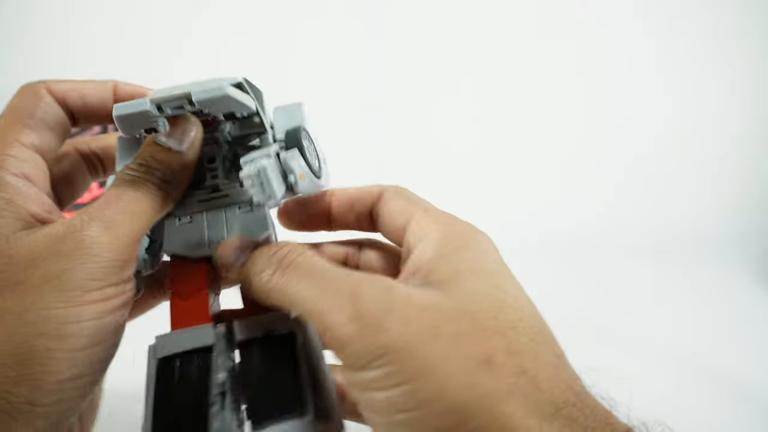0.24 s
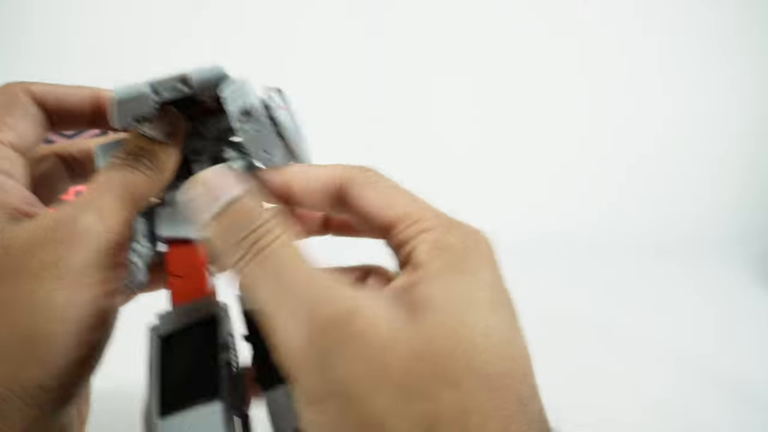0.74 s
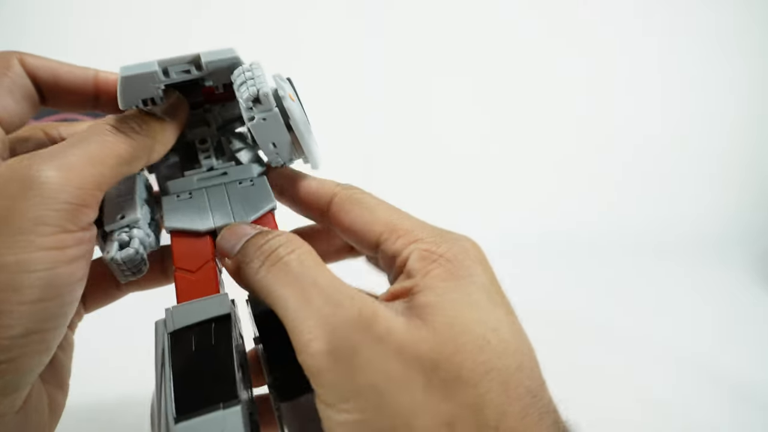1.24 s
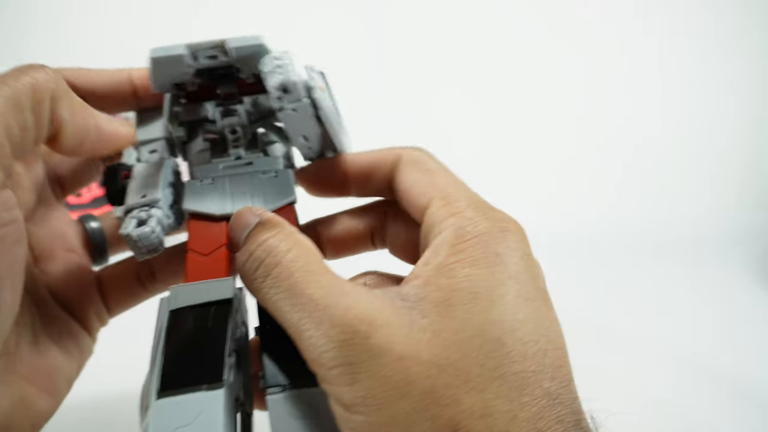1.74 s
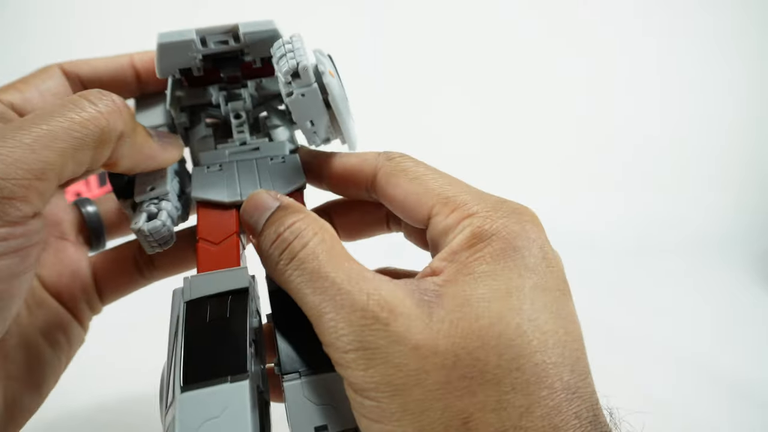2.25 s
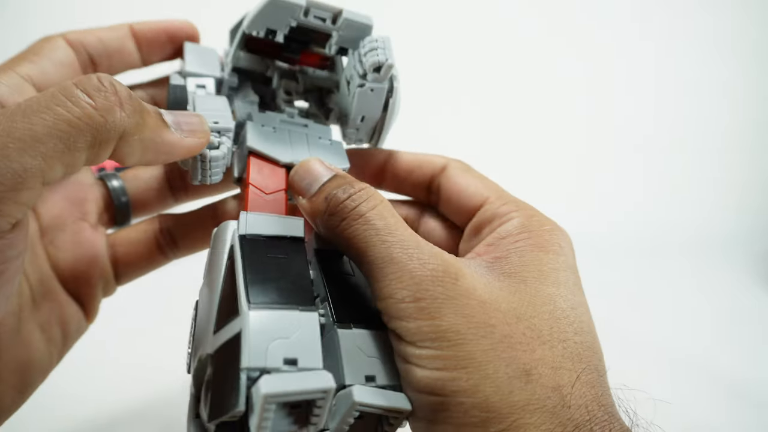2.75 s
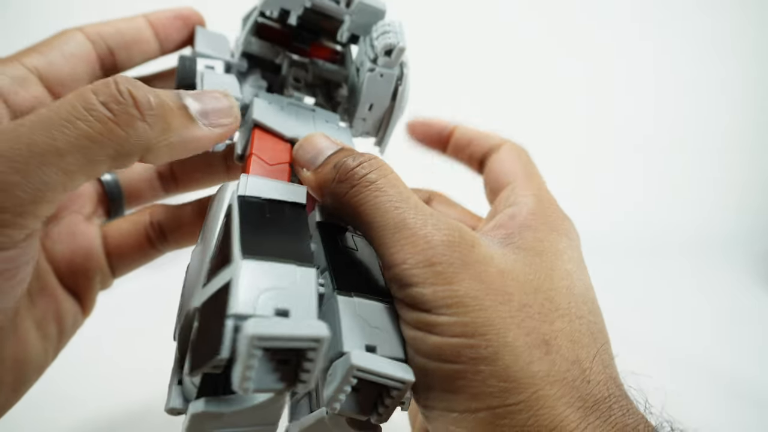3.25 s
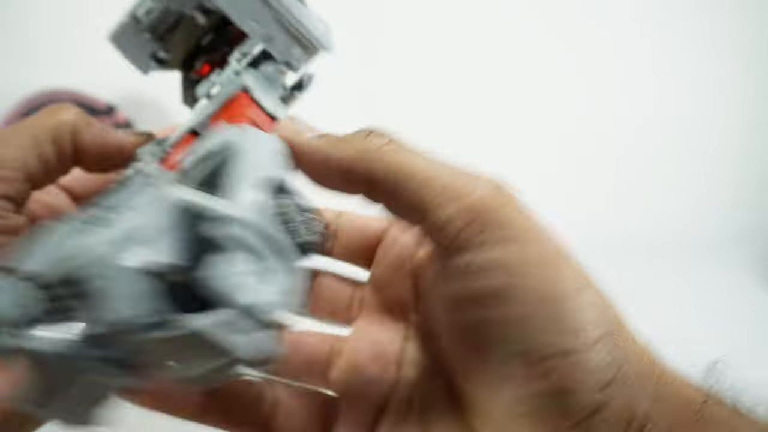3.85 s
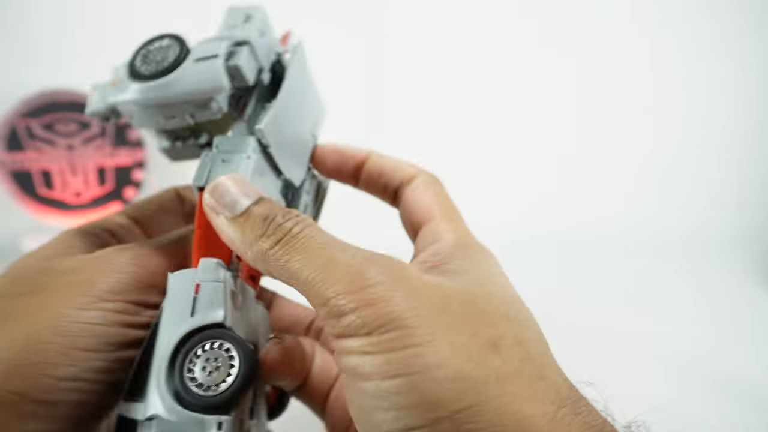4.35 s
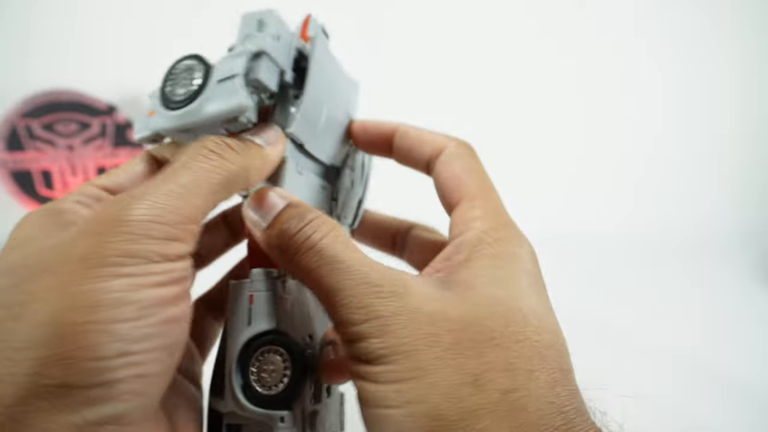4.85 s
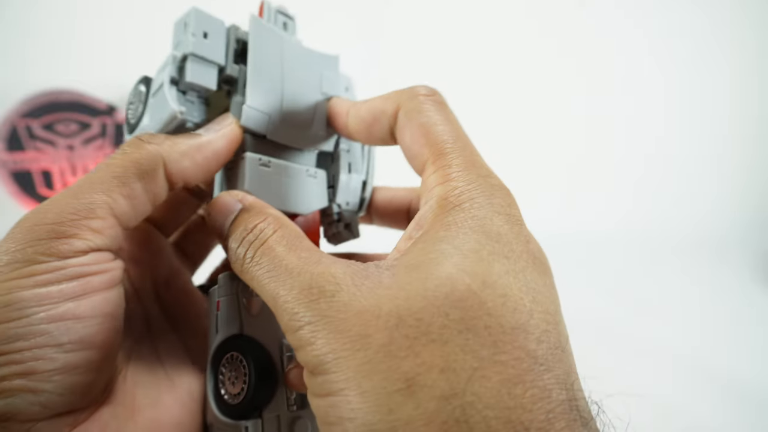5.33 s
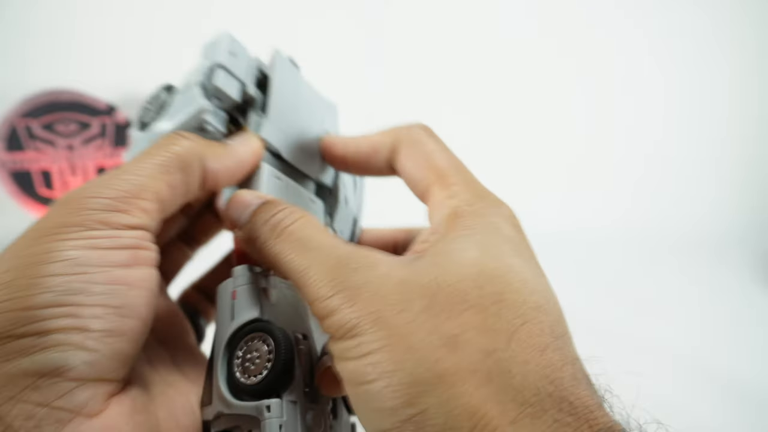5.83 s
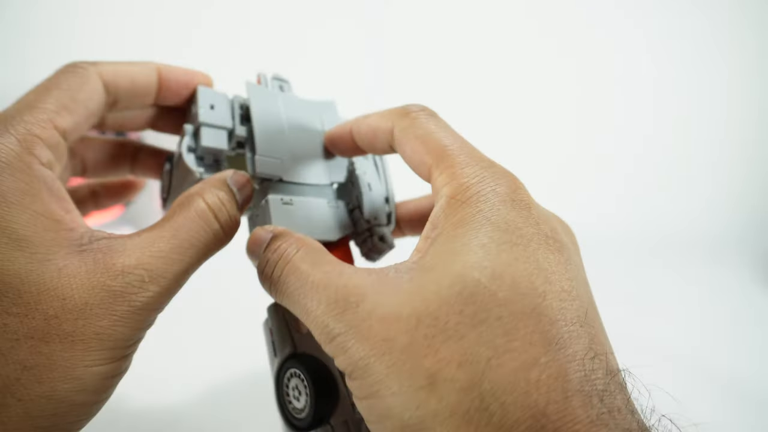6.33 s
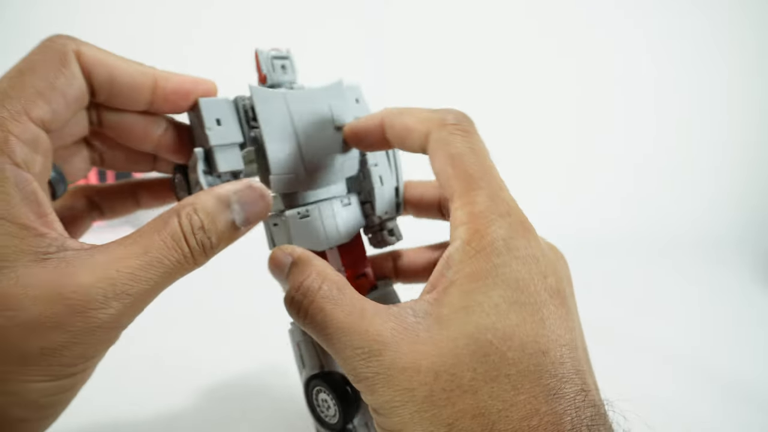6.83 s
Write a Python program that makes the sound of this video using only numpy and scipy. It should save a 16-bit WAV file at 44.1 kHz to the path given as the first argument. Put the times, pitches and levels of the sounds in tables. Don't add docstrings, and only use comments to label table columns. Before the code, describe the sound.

Hard plastic shells and joints click, pop and grind as fingers turn and press them, very close and dry. An early cluster of bright snaps thins to quiet pops, then a busier, much louder flurry comes past the halfway point. Afterwards only small separate clicks remain over soft rubbing and faint room hush, closing with a dull thump on the table.

```python
import sys
import numpy as np
from scipy import signal
from scipy.io import wavfile
from scipy.ndimage import uniform_filter1d

SR = 44100
rng = np.random.default_rng(int(sys.argv[2]) if len(sys.argv) > 2 else 0)


def wav_record(signal):
    frames = np.transpose(np.atleast_2d(signal))
    bounded = np.clip(frames, -1, 1)
    quanta = np.round(bounded * 32767).astype(np.int16)
    wavfile.write(sys.argv[1], SR, quanta)


def to_linear_factor(level_db):
    exponent = np.asarray(level_db, float) / 20
    return 10 ** exponent


N = 312436


def evened(x):
    return x / np.sqrt(np.mean(x ** 2) + 1e-20)


def read(points, hz):
    f, value = np.transpose(points)
    return np.interp(np.log(hz + 1), np.log(f + 1), value)


def add(mix, s, sound):
    part = mix[..., round(s * SR):][..., :sound.shape[-1]]
    part += sound[..., :part.shape[-1]]


def band(x, lo_hz, hi_hz):
    sos = signal.butter(2, [lo_hz, min(hi_hz, SR / 2.2)], "bandpass", fs=SR, output="sos")
    return signal.sosfilt(sos, x)


def ring(hz, db, t60, phase, t, rise=0.00048):
    decay = to_linear_factor(db - 60 * t[:, None] / t60)
    modes = decay * np.sin(2 * np.pi * hz * t[:, None] + phase)
    return modes.sum(1) * (1 - np.exp(-t / rise))


# f/Hz, level/dB
RADIATION = [(900, -8), (1500, -19), (2200, -10.5), (3200, -1), (5000, -0.5), (8000, -1), (10000, -9),
             (16000, -14.5)]


def colour(hz, hollow_db, bright_db):
    tilt = [(2200, hollow_db + 11.5), (2800, 0), (5200, 0.0096), (6500, bright_db + 9.5)]
    return read(RADIATION, hz) + read(tilt, hz)


# f/Hz, bandwidth/Hz, level/dB
SHELL = [(1871, 44.3, 1.5), (2250, 260, 1), (2730, 230, -13.5), (3130, 220, 3), (3932, 120, -1.5),
         (4430, 110, 0), (5540, 58, -27.5)]


def tick(own_hz, hollow_db, bright_db, draw, t60, own_db):
    shell_hz = np.array(SHELL)[:, 0]
    panels_hz = np.geomspace(1000, 15500, 60) * (1 + 0.073 * (draw[:60] - .5))
    hz = np.r_[shell_hz, panels_hz, own_hz]
    uneven_db = 12 * (draw[60:60 + len(hz)] - .5)
    db = colour(hz, hollow_db, bright_db) + uneven_db
    db[-1] = colour(own_hz, hollow_db, bright_db) + own_db
    dies = t60 * (3000 / hz) ** .9 * (.4 + draw[130:130 + len(hz)])
    dies[-1] = 1.46 * t60 * (3000 / own_hz) ** 0.67
    phase = 2.49 * draw[200:200 + len(hz)]
    return ring(hz, db, dies, phase, np.arange(1200) / SR, rise=0.00039)


def click(row, draw):
    s, peak_db, own_hz, hollow_db, bright_db, own_db, loose = row
    lead, span = 60, 600
    rebound_share, rebound_s = 0.43, 0.0075
    seat = 0.24
    at = (draw[270:280] ** 1.5 * span).astype(int)
    sign = np.sign(draw[280:290] - .5)
    fade = np.exp(-abs(at - lead) / SR / rebound_s)
    contact = np.zeros(span)
    contact[at] = loose * rebound_share * to_linear_factor(-seat * (peak_db + 40.5)) * sign * fade
    contact[lead] = 1
    snap = tick(own_hz, hollow_db, bright_db, draw, .016, own_db)
    sound = np.convolve(snap, contact)
    return s - lead / SR, to_linear_factor(peak_db + 2.5) * sound / abs(sound).max()


def crunch(row, draws):
    start, end, start_db, end_db, own_hz, bright_db = row
    size = int(np.clip((end - start) * SR, 50, SR // 8))
    push = to_linear_factor(np.linspace(start_db, end_db, size)) * signal.windows.tukey(size, .4)
    chance, side, force = np.moveaxis(rng.random((len(draws), 3, SR // 8))[..., :size], 1, 0)
    contacts = (chance < 700 / SR) * np.sign(side - .5)
    contacts = contacts * to_linear_factor(-2.2 * np.log(force + .004))
    contacts /= np.sqrt((contacts ** 2).sum(0).mean() + 1e-12)
    gentle = np.clip((-41.5 - max(start_db, end_db)) / 14, 0, 1) * (own_hz < 5000)
    sound = 0
    for contact, draw in zip(contacts, draws):
        spot = tick(own_hz, -5.0, bright_db, draw, 0.022, 8 + 6 * gentle)
        sound = sound + signal.fftconvolve(contact * push, spot / np.linalg.norm(spot))
    return start, sound


# t/s, peak level/dB, f/Hz
DULL = [(0.5908, -24, 2670), (0.6135, -20.5, 3130), (0.7057, -18, 3130), (0.7165, -30.5, 3050),
        (1.134, -43, 1610), (1.4468, -31.5, 2390), (1.4535, -36, 3290), (1.656, -47, 3270),
        (2.055, -48, 3880), (2.0666, -46, 1860), (2.076, -41, 1830), (2.123, -48, 1900), (2.526, -51, 1970),
        (2.549, -48, 1970), (2.631, -46, 2830), (2.6586, -44, 2880), (3.2113, -43, 2340),
        (3.3204, -48, 3100), (3.4152, -46, 2940), (3.4654, -46, 2400), (3.4713, -46, 2240),
        (3.4785, -45, 2820), (3.5113, -25, 3050), (3.571, -42, 2450), (3.625, -49, 4900),
        (3.7705, -39, 1800), (3.892, -41, 2020), (3.906, -22, 2260), (3.924, -21, 2300),
        (3.9387, -23, 3230), (4.0311, -44, 2140), (4.073, -39, 3440), (4.1125, -15.5, 2740),
        (4.2625, -14, 2280), (4.352, -43, 3130), (4.59, -41, 2370), (4.769, -45, 4520), (4.8335, -38, 2280),
        (5.6274, -44, 3000), (5.8565, -45, 2620), (5.926, -40, 2430), (6.187, -38.5, 3160),
        (6.378, -44, 4900), (6.597, -40.5, 1920), (6.6614, -43, 4300), (6.9167, -43, 4150),
        (4.8276, -20, 6270), (2.1395, -53, 3470), (2.2957, -52, 3400), (3.442, -43, 2320),
        (0.744, -42, 2200), (0.776, -46, 2150), (6.7138, -40.5, 2040)]
# t/s, peak level/dB, f/Hz
SHARP = [(.5835, -28, 8600), (0.606, -26, 8500), (0.674, -22, 5800), (.8628, -34.5, 7860),
         (1.3613, -41, 4370), (1.4433, -35, 6540), (2.16, -56, 6000), (2.6211, -53, 5240),
         (3.2307, -41, 5700), (3.4535, -46, 4600), (3.9446, -23, 7540), (3.9479, -15.5, 4560),
         (4.144, -19, 7600), (4.1485, -14, 7900), (4.315, -26, 7750), (5.9355, -41, 4340),
         (5.9767, -31, 12400)]


def rebounds(draws):
    out = np.zeros((2, N))
    rows = [(*row, -6, -16, .018, 13) for row in DULL]
    rows += [(*row, -14, 2, .011, 7) for row in SHARP]
    for (s, peak_db, own_hz, hollow_db, bright_db, t60, own_db), draw in zip(rows, draws[::-1]):
        snap = tick(own_hz, hollow_db, bright_db, draw, t60, own_db)
        snap /= abs(snap).max()
        lag_s = (own_hz > 4000) * np.sign(draw[-1] - .5) / SR
        add(out[0], s, to_linear_factor(peak_db + 1.0) * snap)
        add(out[1], s + lag_s, to_linear_factor(peak_db + 1.5) * snap)
    return out


# t/s, peak level/dB, loudest mode f/Hz
BOX = [
    (.262, -38, 2120),
    (1.291, -42, 2230),
    (3.5068, -26, 2300),
    (3.5111, -22, 2440),
    (3.5618, -34, 1380),
    (3.9935, -41.5, 2420),
    (4.092, -35, 1820),
    (4.1883, -30.5, 1960),
    (4.8642, -48, 2250),
    (5.632, -42.5, 3200),
]
SOCKET = [
    (1.5838, -45.5, 3530),
    (2.1387, -43, 1910),
    (2.1898, -43, 1870),
    (2.2951, -41, 1910),
    (2.361, -45.5, 1890),
    (4.0616, -42.5, 2270),
    (6.5818, -49, 3120),
    (6.7116, -39.5, 4270),
]
LATCH = [(.577, -17.5, 7240), (.7047, -18.5, 3130), (.9561, -29, 4650), (.958, -30, 4500),
         (1.44, -26, 3860), (1.7992, -37.5, 3300), (1.817, -30.5, 2950), (3.3507, -41, 3330),
         (3.3545, -31.5, 2970), (3.415, -41, 4760), (3.9013, -16.5, 3100), (3.9615, -13, 4660),
         (4.0247, -50, 3290), (4.1281, -14.5, 2790), (4.1335, -6, 2530), (4.1409, -7, 2850),
         (4.2176, -28.5, 3220), (4.3236, -15.5, 5470), (4.738, -33, 4490), (4.7789, -34.5, 4950),
         (6.2127, -38, 3360), (6.3834, -37, 4570)]
GRIPPED = [(.1157, -28, 3134), (.7537, -26.5, 3000), (.8343, -30.5, 3030), (2.5984, -40, 3130),
           (2.6516, -35, 3130), (3.5228, -23, 2480), (3.7887, -26.5, 2265), (3.8354, -45, 3160),
           (3.9189, -18, 3200), (4.1556, -21, 2710), (4.2995, -19.5, 3370), (4.4221, -32.5, 2660),
           (4.9875, -41, 3090), (5.5593, -38.5, 2100), (5.7737, -46, 3050), (5.9233, -44, 4170),
           (6.316, -41.5, 3530), (6.6876, -36, 4180), (6.7079, -38, 3250), (6.942, -42, 3900),
           (6.951, -32, 4110)]
PIN = [(.1773, -41, 3950), (.5718, -28, 3000), (.587, -18, 2740), (.6003, -26, 6900), (.6763, -21.5, 7000),
       (.726, -18, 7370), (.8621, -34, 2820), (.9807, -27.5, 3250), (1.8355, -42.5, 3130),
       (2.074, -42, 2750), (3.5329, -19, 3110), (4.0863, -37, 2250), (4.108, -17.5, 3240),
       (4.5754, -30.5, 3350), (4.8794, -36.5, 3180), (5.9433, -37, 4400), (6.1763, -25, 3730)]
STUD = [
    (.3794, -40, 3400),
    (.7088, -18, 3250),
    (.9689, -24, 3250),
    (3.433, -38, 4340),
    (4.147, -16, 2260),
    (5.9735, -24, 3270),
    (6.1643, -27, 3250),
]
PANEL = [(.6937, -30, 2850), (1.4759, -40, 3230), (1.7882, -39.5, 3330), (3.6946, -34, 4660),
         (3.7263, -43, 2100), (3.757, -30, 5270), (3.787, -28.5, 2310), (3.9335, -24.5, 3120),
         (3.944, -23.5, 4540), (3.978, -34.5, 4530), (4.259, -11.5, 3020), (4.3065, -22.5, 3540),
         (4.5674, -42, 3290), (4.9032, -44, 2170), (4.9171, -43, 3130), (5.4406, -36.5, 3040),
         (5.8613, -43, 2490)]
FLAP = [(.0861, -34.5, 4600), (.2318, -44, 4280), (.3939, -31.5, 2170), (.6108, -17, 3040),
        (.6702, -27, 7600), (1.4982, -34.5, 4380), (3.7403, -40, 3030), (3.958, -18, 4600),
        (4.0991, -25, 2180), (4.3125, -28, 3630), (4.3584, -36, 2630), (4.7293, -40.5, 3100),
        (4.7475, -31, 5700), (4.8295, -21, 6000), (5.5074, -43, 2280), (5.6036, -33, 2030),
        (6.1779, -28, 3180), (6.2299, -38, 1960)]
# t/s, peak level/dB, f/Hz
FAINT = [
    (2.58, -53, 2470),
    (2.7457, -48, 3220),
    (3.228, -43, 2750),
    (5.8274, -49, 3220),
    (6.083, -41, 4800),
    (6.295, -52, 3480),
    (6.6577, -49, 4100),
]
# t/s, peak level/dB, f/Hz
SPECK = [
    (2.453, -63, 9600),
    (2.58, -48, 8500),
    (2.684, -50, 8200),
    (6.35, -52, 9500),
]
# start t/s, end t/s, top level/dB, loudest mode f/Hz, bright part level/dB
SETTLING = [(0.0, 0.075, -50.5, 2230, -1), (0.372, 0.415, -45, 1910, -5), (0.867, 0.876, -33.5, 2500, -33),
            (0.955, 1.003, -29.5, 3294, -4), (1.117, 1.243, -52.5, 4650, -6),
            (1.44, 1.456, -30.5, 1930, -4), (3.033, 3.093, -55, 4660, -27), (3.29, 3.38, -47, 1920, -6.5),
            (3.497, 3.559, -29, 2370, -18), (3.542, 3.555, -35, 1480, -9), (3.781, 3.806, -32.5, 2200, -9),
            (3.975, 3.97, -43, 4650, -11), (4.017, 4.06, -42, 2140, -13), (4.163, 4.215, -34.5, 2410, -18),
            (4.262, 4.278, -22.5, 2390, -11), (4.335, 4.378, -36, 2590, -7), (4.734, 4.786, -45, 3130, -13),
            (4.766, 4.826, -42, 4850, -9), (6.167, 6.208, -35, 3350, -9), (6.361, 6.47, -52.5, 4840, -5),
            (6.584, 6.673, -54, 4120, -15)]
STRAINING = [(1.602, 1.663, -45, 3380, 2.5), (1.844, 1.932, -57.5, 3040, -7),
             (3.401, 3.467, -45.5, 2380, -9), (3.721, 3.775, -37.5, 3070, -5),
             (4.074, 4.108, -30, 3120, -18), (4.456, 4.498, -43, 2350, -17), (4.867, 4.928, -48, 3130, -15),
             (5.488, 5.518, -44, 2450, -20), (6.134, 6.163, -46, 2230, -7), (6.925, 6.967, -39, 4200, -28)]
SLIDING = [(0.268, 0.328, -50.5, 6060, -8.5), (0.517, 0.582, -51.5, 2970, -10),
           (0.563, 0.64, -34.5, 3010, -0.5), (0.669, 0.738, -38, 3130, -8), (0.748, 0.81, -50, 2160, -30),
           (1.228, 1.36, -58.5, 2260, -11), (1.302, 1.391, -54, 5620, -2.5),
           (1.769, 1.836, -57.5, 3050, -4), (2.53, 2.654, -66, 2600, -12), (3.195, 3.284, -59, 2860, -23),
           (3.347, 3.4, -50.5, 2990, -4.5), (3.46, 3.53, -42.5, 3380, -7.5), (3.9, 3.973, -34, 3200, -14),
           (4.129, 4.16, -22, 2240, -27), (4.205, 4.256, -37, 3260, -4), (4.301, 4.329, -30, 3510, -19),
           (5.912, 5.971, -51.5, 4250, -7), (5.972, 6.013, -49.5, 2406, -2), (6.669, 6.73, -58, 4200, -29)]


def clicks():
    parts = [(BOX, 7.8, -7, 9.6, 1), (SOCKET, 0.3, -23, 18.4, 0.21), (LATCH, -17.5, -7.5, 10.3, 0.9),
             (GRIPPED, -5, -17, 13.6, 1), (PIN, -3.7, -1.2, 8.9, .9), (STUD, -6, 5.2, 9, 0.96),
             (PANEL, -1.5, -5, 11.4, 1), (FLAP, -11.5, -9.5, 11.2, 1)]
    taps = sorted((*row, *part) for rows, *part in parts for row in rows)
    rattles = [(a, b, db, db - 19, *c) for a, b, db, *c in SETTLING]
    rattles += [(a, b, -60, db, *c) for a, b, db, *c in STRAINING]
    rattles += [(a, b, db, db, *c) for a, b, db, *c in SLIDING]
    rattles.sort()
    draws = rng.random((len(taps), 290))
    sounds = [click(row, draw) for row, draw in zip(taps, draws)]
    faint_draws = rng.random((len(FAINT), 290))
    sounds += [click((*row, -8, -6, 13, .9), draw) for row, draw in zip(FAINT, faint_draws)]
    spots = rng.random((len(rattles), 6, 290))
    sounds += [crunch(row, draw) for row, draw in zip(rattles, spots)]
    out = np.zeros((2, N))
    sides_db = 0.42 * rng.uniform(-2.2, 1, len(sounds))
    for (s, sound), side_db in zip(sounds, sides_db):
        add(out, s, sound * to_linear_factor([[side_db], [-side_db]]))
    for row, draw in zip(SPECK, rng.random((len(SPECK), 290))):
        add(out, *click((*row, -20, 14, 1.5, .2), draw))
    return out + rebounds(draws)


# t/s, rubbing level/dB
EFFORT = [(0.0, -46.5), (.33, -52), (.59, -60), (.71, -42), (.82, -45.5), (1.22, -61), (1.44, -50),
          (2.31, -64.5), (2.62, -51), (2.85, -64), (3.37, -49.5), (4.04, -48), (4.24, -36.5), (4.51, -50),
          (4.81, -51), (5.3, -64), (6.1, -54), (7.08, -57)]


def rubbing():
    s, rub_db = np.transpose(EFFORT)
    t = np.arange(N) / SR
    out = np.zeros(N)
    for hz, width, db in SHELL:
        slips = to_linear_factor(2.3 * np.minimum(rng.exponential(1, N), 5))
        slips *= (rng.random(N) < 450 / SR) * rng.choice([-1, 1], N)
        grip = uniform_filter1d(rng.standard_normal(150), 2)
        grip_db = 2.4 * evened(np.interp(t, np.arange(150) / 20, grip))
        tap = ring(np.array([hz]), 0, 1.9 / (width + 100), 0, t[:1500])
        out += to_linear_factor(0.63 * db + grip_db) * signal.oaconvolve(slips, evened(tap))[:N]
    fizz = to_linear_factor(2.0 * rng.exponential(1, N)) * (rng.random(N) < 4000 / SR) * rng.standard_normal(N)
    body = evened(out) + 1.2 * evened(band(fizz, 1600, 6240))
    bright = to_linear_factor(-12.5) * evened(band(fizz, 3900, 13400))
    return to_linear_factor(np.interp(t, s, rub_db) - 8) * (evened(body) + bright)


# t/s, level/dB, f/Hz
KNOCKS = [
    (.612, -45, 1150),
    (.706, -45, 1210),
    (0.863, -48, 260),
    (3.509, -44, 640),
    (3.5105, -36, 1270),
    (4.132, -38, 480),
    (4.1333, -47, 206),
    (4.133, -34, 950),
    (6.177, -45.5, 306),
    (6.35, -48, 413),
]


def knocks():
    out = np.zeros(N)
    t = np.arange(3000) / SR
    for s, db, hz in KNOCKS:
        add(out, s, ring(hz * np.array([.6, 1, 1.5]), db, 9 / hz + 0.0093, 0, t, rise=0.0016))
    return out


# middle t/s, length t/s, rumble level/dB
LEANS = [
    (0.14, .2, -58.5),
    (0.705, .5, -70),
    (2.552, 0.37, -72),
    (3.558, 0.16, -55),
    (4.1, 1.6, -67),
    (4.862, 0.86, -71),
    (5.684, 0.18, -74),
    (6.193, 0.74, -68),
]
# f/Hz, level/dB, t60/s
BUMP = [(50, -45, 0.3), (86, -24, 0.15), (146.6, -29, 0.096), (163, -34, 0.19)]


def table():
    t = np.arange(N) / SR
    weight = to_linear_factor(-79.5)
    for s, length, db in LEANS:
        weight = weight + to_linear_factor(db) * np.cos(np.pi * np.clip((t - s) / length, -.5, .5)) ** 2
    out = weight * evened(band(band(rng.standard_normal(N), 27, 84), 33.4, 190))
    hz, db, t60 = np.transpose(BUMP)
    phase = np.array([-2.5, 5.0, 7.5, 1.5])
    add(out, 6.998, ring(hz, db - 3, t60, phase, np.arange(5000) / SR, rise=0.0053))
    return out


def sleeves():
    drift = np.interp(np.arange(N) / SR, np.arange(100) / 12, rng.standard_normal(100))
    noise = band(band(rng.standard_normal(N), 420, 650), 420, 650)
    return to_linear_factor(-78.5 + 5 * evened(drift)) * evened(noise)


# f/Hz, level/dB per Hz
AIR = [(18, -27), (30, -19), (106, -5.5), (189, -2.5), (400, -7.5), (1860, -13), (6550, -21), (16000, -31)]
# f/Hz, likeness/1
SAME = [(60, 0.91), (380, 0.67), (2380, 0.32), (15000, 0.071)]


def hush():
    frames, hz = N // 256 + 5, np.fft.rfftfreq(1024, 1 / SR)
    a, b, c, d, patches = rng.standard_normal((frames, 513, 5)).T
    patches = evened(uniform_filter1d(uniform_filter1d(patches, 4, 0), 14, 1))
    same = np.clip(read(SAME, hz), -1, 1)[:, None]
    left, other = a + 1j * b, c + 1j * d
    z = np.array([left, same * left + np.sqrt(1 - same ** 2) * other])
    z *= to_linear_factor(read(AIR, hz)[:, None] + 2.8 * patches)
    return to_linear_factor(-60.5) * evened(signal.istft(z, nperseg=1024, noverlap=768)[1][:, :N])


def room(x, t60, gap_s):
    taps = np.zeros((2, SR // 2))
    at = np.arange(0, SR // 2 - 20, 20) + rng.integers(0, 20, (2, SR // 40))
    np.put_along_axis(taps, at, rng.choice([-1., 1.], at.shape), 1)
    t = np.arange(SR // 2) / SR
    taps *= to_linear_factor(-60 * t / t60) * (t > gap_s)
    return signal.fftconvolve(x, taps / np.linalg.norm(taps[0]), axes=1)[:, :N]


def scene():
    steep = signal.butter(7, 1500, "highpass", fs=SR, output="sos")
    toy = signal.sosfilt(steep, clicks() + rubbing())
    blunt = signal.butter(1, 9000, fs=SR)
    toy = signal.lfilter(*blunt, toy)
    close = room(toy, 0.052, .0003)
    treble = signal.lfilter([1, -1], 1, close)
    wet = to_linear_factor(-8.5) * treble + to_linear_factor(-17.0) * room(toy, 0.13, 0.0092)
    balance = to_linear_factor([[.45], [-.45]])
    return (toy + wet + hush()) * balance + knocks() + table() + sleeves()


def band_limit(x):
    return signal.sosfilt(signal.butter(12, 16480, fs=SR, output="sos"), x)


def record(dry):
    edge = signal.firwin(301, 15750, window=("kaiser", 4), fs=SR)
    mix = signal.oaconvolve(dry, edge[None], "same")
    return band_limit(mix)


dry = scene()
out = record(dry)
wav_record(out)
```